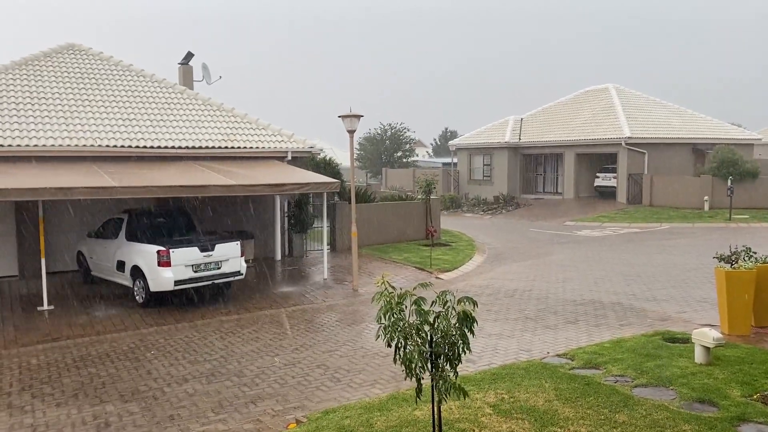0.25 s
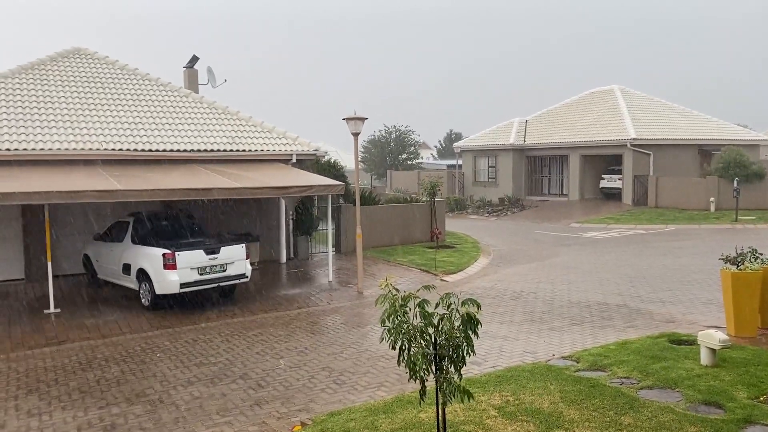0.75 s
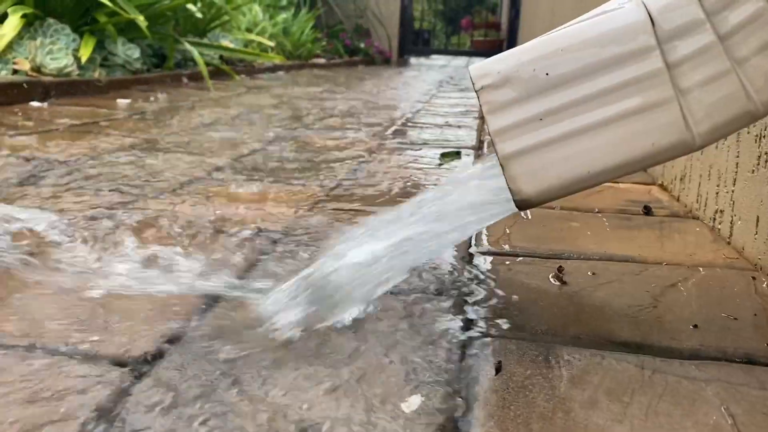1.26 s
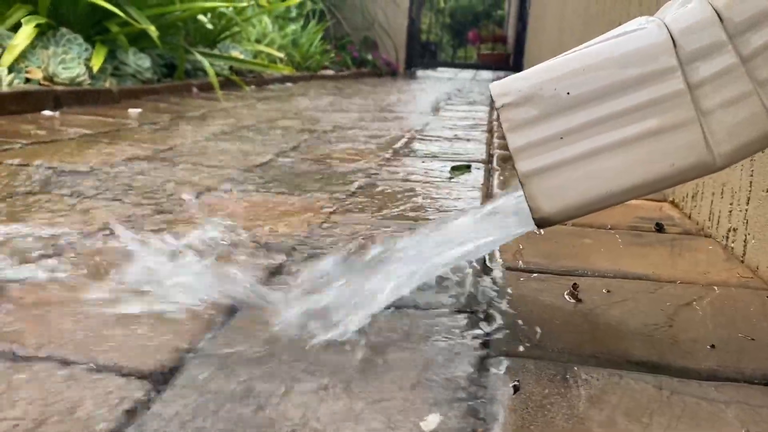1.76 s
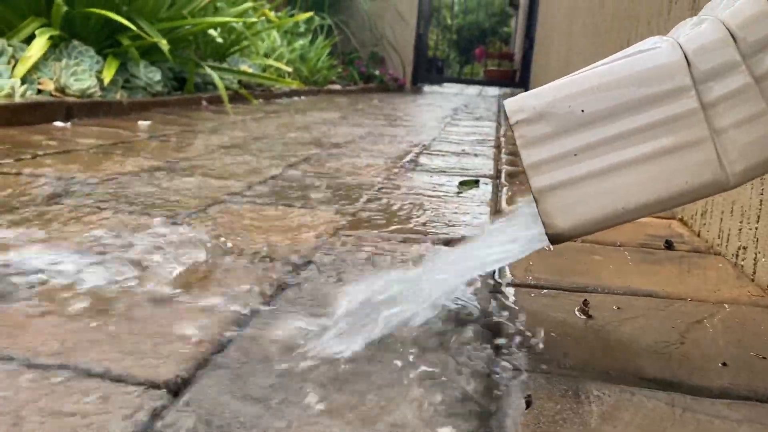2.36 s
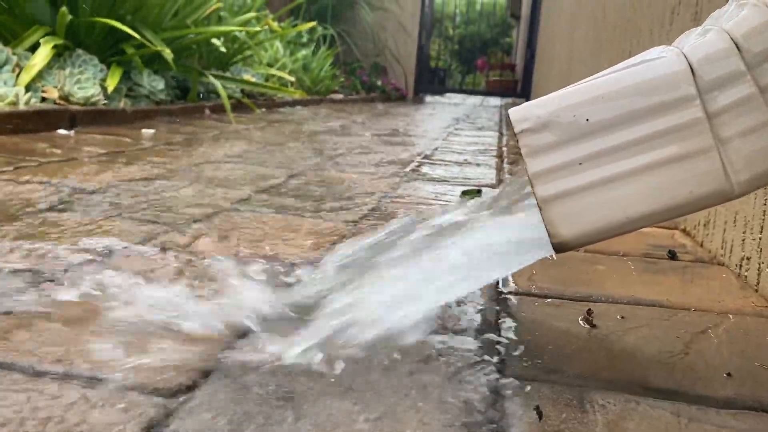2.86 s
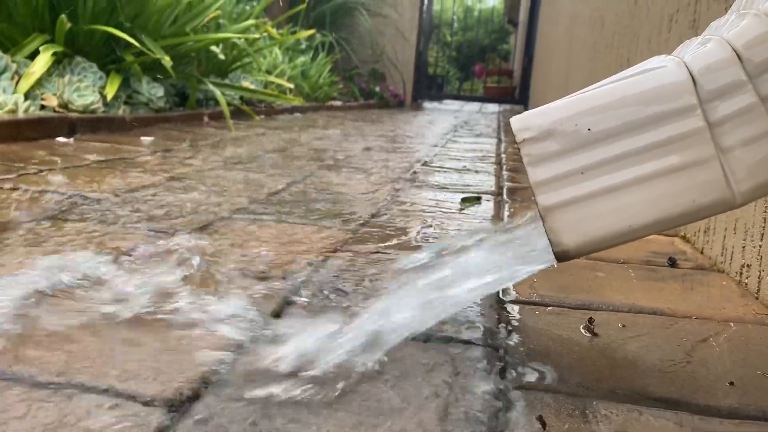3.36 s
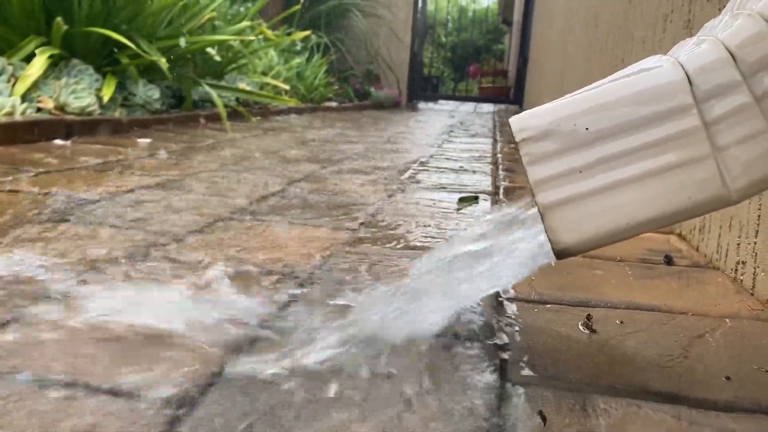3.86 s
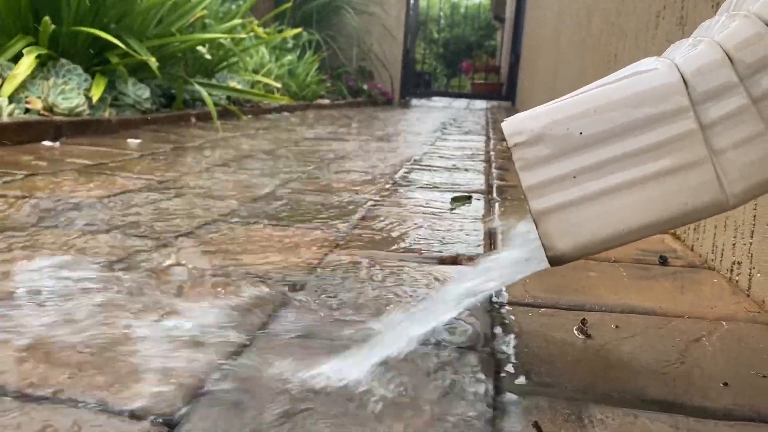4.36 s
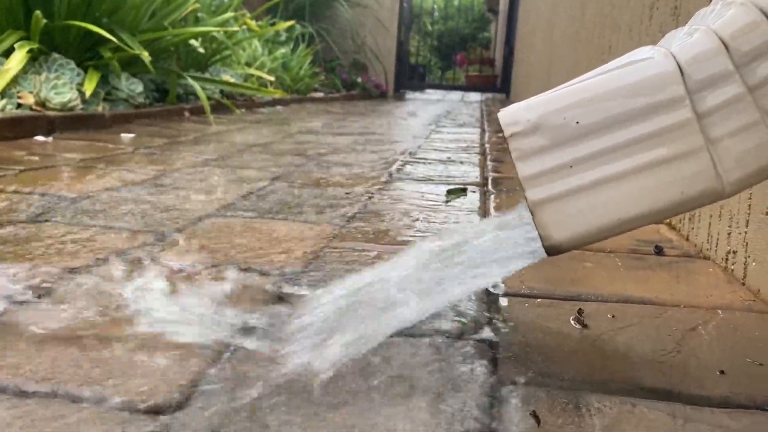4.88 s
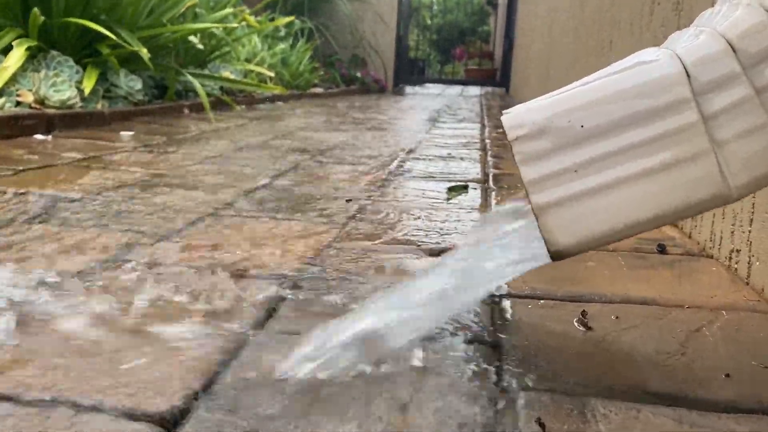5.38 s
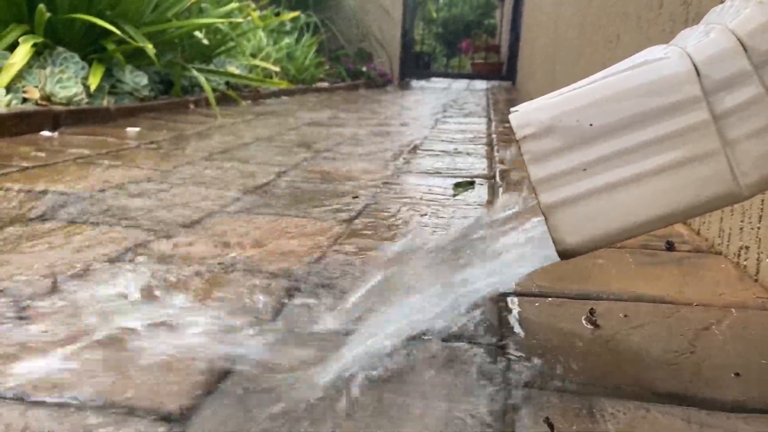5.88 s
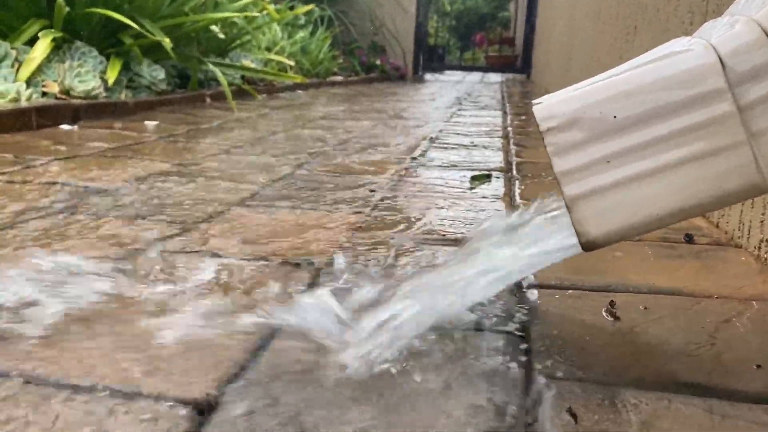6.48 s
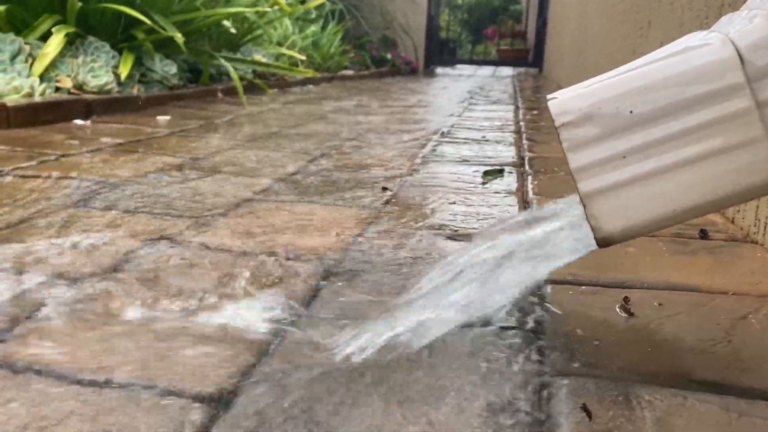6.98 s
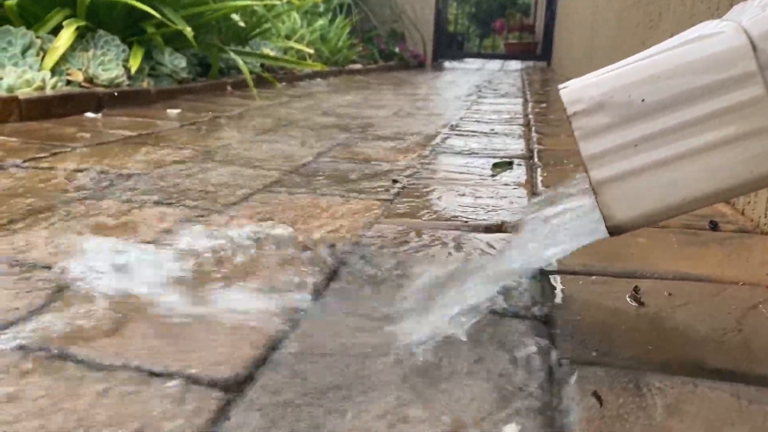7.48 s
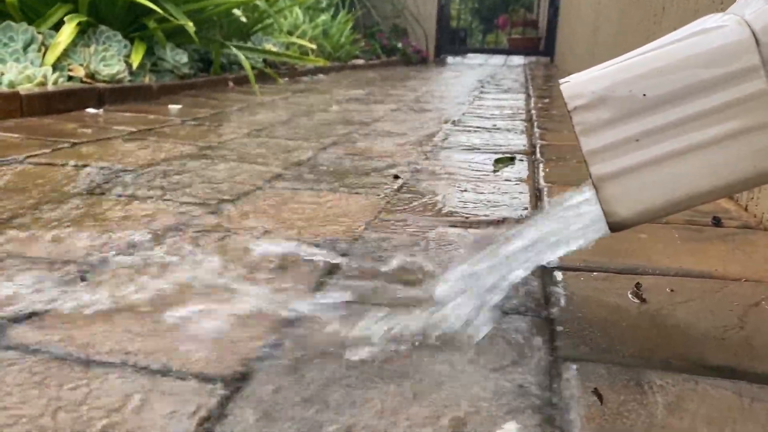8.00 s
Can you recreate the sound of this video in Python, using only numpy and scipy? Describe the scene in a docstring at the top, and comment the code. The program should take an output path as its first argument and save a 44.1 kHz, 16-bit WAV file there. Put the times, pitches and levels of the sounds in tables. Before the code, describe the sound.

Outdoors among houses, heavy rain hisses steadily on paving and patters on a roof for about a second. After a tiny gap of silence, a close downpipe spout bursts in: water slaps wet stone in irregular gushes, with crisp spray, ringing bubbles and hollow gulps from the pipe. Low churning, thuds and soft wind buffets lie beneath, with rain all around. The stereo microphone sits near the spout, and the stream continues to the end.

```python
"""Heavy rain on a paved street with patter on a roof; then, after an instant of silence, the spout of a downpipe.
The stream slaps the wet paving in uneven gushes: noise bursts make the spray, decaying sines the trapped bubbles,
and resonances of the pipe mouth ring along. Gusts on the microphone and water churning in the pipe rumble
underneath as filtered noise, with thumps and thuds. Rain goes on all around as coloured noise with ticking drops."""
import sys
import numpy as np
from scipy import signal
from scipy.fft import rfft, irfft, next_fast_len
from scipy.io import wavfile

SR = 44100
rng = np.random.default_rng(int(sys.argv[2]) if len(sys.argv) > 2 else 0)


def store_pcm(level_fs):
    """Save levels as 16-bit WAV."""
    pcm = np.round(np.clip(level_fs, -1, 1) * 32767).astype(np.int16)
    wavfile.write(sys.argv[1], SR, np.atleast_2d(pcm).T)


N = 363384
TIME = np.arange(N) / SR
PADDED = next_fast_len(N + SR // 2, True)
FREQS = np.maximum(np.arange(PADDED // 2 + 1) * SR / PADDED, 1)
STREET_END_S, SPOUT_START_S = 1.0, 1.048
CUTOFF_HZ = 15850


# Spray thrown off the paving. Each row: frequency in Hz, relative power density in dB.
SPRAY_SPECTRUM = [(150, -16), (400, 3.5), (620, -2), (790, 0), (1130, -3), (1550, -0.5), (2000, -2.5),
                  (2400, -1.5), (3200, -9), (4700, -2.5), (5700, -7.5), (7000, 1), (9000, -8.5),
                  (11000, -2), (13000, -8.5), (16000, -22)]
# Clouds of small bubbles. Each row: centre pitch in Hz, spread in octaves, bubbles per second,
# typical ring in cycles, level in dB relative to the splash.
BUBBLE_CLOUDS = [(1157, 0.17, 45, 21, -18.5), (2105, 0.32, 110, 28, -15), (3663, 0.257, 430, 46, -4.5),
                 (8470, 0.386, 380, 47, -11.5)]
# Air resonances of the pipe mouth. Each row: frequency in Hz, width in Hz, relative level in dB.
MOUTH_MODES = [(907, 45, 5), (1083, 33, 11), (1152, 18, 7), (1250, 32, 0.5), (1987, 140, -13),
               (2930, 180, 4), (3850, 110, -0.5)]
# Water rattling round the pipe mouth. Each row: time in seconds, swell of the ringing in dB (negative dips).
RATTLES = [(1.425, 7), (1.728, 6), (2.61, -2), (3.99, 8.5), (8.135, 9.5)]
# How the spout reaches the two microphones. Each row: frequency in Hz, direct share of power from 0 to 1,
# phase lead of the right one in radians, left minus right level in dB.
SPOUT_PORTS = [(330, .74, .1, -.9), (700, .19, 2.6, .7), (1100, .45, -.4, 3.1), (1450, .25, -.4, 1.2),
               (1950, .35, 1.8, 5.6), (2300, .5, -.9, 3.1), (2750, .6, -1.7, 5.4), (3300, .72, -1, 2.2),
               (3900, .72, 0, .7), (4700, .5, -.4, 6), (5500, .1, -.7, 3.8), (6900, .9, 0, .4),
               (9050, .93, 3.15, 0), (13300, .9, 9.42, 0), (15500, .85, 12.6, 0)]


def stream():
    """The jet breaks into lumps: gushes throw spray, bubbles clump in their own way, the pipe mouth rings along."""
    gush = from_db(1.45 * lumps())
    spatter = rms_one(impacts(3400 * gush, spread_db=3.0, burst_s=0.0011) * gush)
    spray = from_db(-3.5) * colour(spatter, SPRAY_SPECTRUM)
    spray = spray + splashlets(gush, spread_db=1.64, burst_s=0.0017)
    fizz = 0
    for hz, octaves, per_s, cycles, level_db in BUBBLE_CLOUDS:
        clumps = gush * from_db(2.2 * lumps())
        fizz = fizz + from_db(level_db) * bubble_cloud(clumps, hz, octaves, per_s, cycles, spread_db=2.5)
    mouth_db = -13.0 + swells(RATTLES, rise_s=0.029, fall_s=0.06)
    mouth = from_db(mouth_db) * resonate(spatter, MOUTH_MODES)
    drops = plops(bubble_db=-1.5, spray_db=-5.0, smack_db=-4.5) + glugs(glug_db=-9.5, slosh_db=-14.5)
    splash = from_db(flow_db()) * (spray + fizz + mouth) + drops
    return microphones(walls(splash, t60=0.12, echo_db=-2.0), SPOUT_PORTS)


# Heavier slugs of water leave the spout. Each row: time in seconds, swell of the splash in dB (negative dips).
SLUGS = [(1.092, 2.5), (1.136, 3), (1.427, 1), (1.549, 2), (1.723, 2.5), (2.205, 4), (2.555, 5),
         (2.621, 3.5), (2.699, 2.3), (2.869, 4.5), (2.959, 4), (3.073, 3.5), (3.327, 2.5), (3.465, 3.8),
         (3.776, 4), (3.905, 3.5), (3.974, 1), (4.142, 3), (4.582, 2.2), (4.806, 1.5), (5.028, 1),
         (5.462, 1.5), (5.602, 3.5), (5.902, -1), (6.153, 0.5), (6.21, 2), (6.638, -1), (6.743, 3.3),
         (6.853, 2.7), (7.027, 2.5), (7.485, 1.5), (7.563, 3), (7.677, 2.7), (7.817, 3), (7.895, 2.1),
         (8.126, 4.6)]
# The jet thins for a moment. Each row: time in seconds, dip of the splash in dB.
LULLS = [(1.511, -1.9), (1.627, -4), (1.918, -3), (2.447, -2.5), (2.591, -4.5), (2.801, -0.5), (3.25, -1.5),
         (3.507, -4), (3.63, -2.5), (3.827, -2), (4.052, -1.5), (4.103, -3), (4.237, -1), (4.363, -3.5),
         (4.42, -2.0), (4.546, -3.5), (4.896, -2.5), (5.099, -2), (5.168, -1), (5.668, -3.4), (6.249, -1.8),
         (6.303, -4.5), (6.904, -1.5), (6.976, -2), (7.243, -2.5), (7.44, -2.1), (7.533, -3), (7.635, -3.5),
         (7.862, -5.5), (7.994, -3)]


def flow_db():
    """Level of the splash: an even stream that wanders, shifted by each slug of water and sinking in each lull."""
    steady = -30 + 0.4 * drift(rate=16)
    return steady + swells(SLUGS, rise_s=0.017, fall_s=0.027) + swells(LULLS, rise_s=0.03, fall_s=0.03)


def lumps(per_s=150, drain_s=0.009):
    """Uneven lumps of water land at random, start suddenly and drain fast, never piling very high; spread 1."""
    landings = (rng.random(N) < per_s / SR) * rng.uniform(.3, 1, N)
    water = signal.lfilter([1], [1, -np.exp(-1 / (drain_s * SR))], landings)
    swing = rms_one(signal.sosfilt(signal.butter(1, 15, "high", fs=SR, output="sos"), water))
    return rms_one(np.tanh(swing / 2))


# Small splats of different sizes. Each row: low edge in Hz, high edge in Hz, average splats per second
# before the gushes crowd or thin them, level in dB relative to the splash.
SPLASHLETS = [(1460, 2300, 52, -16.5), (2470, 3460, 65, -11), (3130, 4470, 90, -10), (4250, 9000, 80, -9.5),
              (9400, 12100, 60, -11.5)]


def splashlets(gush, spread_db, burst_s):
    """Torn-off blobs splat one over another, each in the pitch range set by its size."""
    out = 0
    for low_hz, high_hz, per_s, level_db in SPLASHLETS:
        edges = [low_hz, min(high_hz, CUTOFF_HZ)]
        band = signal.butter(2, edges, "band", fs=SR, output="sos")
        splats = signal.sosfilt(band, impacts(per_s * gush, spread_db, burst_s))
        out = out + from_db(level_db) * rms_one(splats)
    return out


def bubble_cloud(gush, centre_hz, octaves, per_s, cycles, spread_db, count=9000):
    """Air dragged under by the stream: bubbles of all sizes, more of them in a gush; unit power."""
    out = np.zeros((3, N))
    chance, shape = rng.random((count, 5)), rng.standard_normal((count, 2))
    # a gush takes up a larger part of the running sum, so more births fall in it
    births = np.searchsorted(np.cumsum(gush) / np.sum(gush), chance[:int(per_s * N / SR), 0]) / SR
    heights = from_db(-spread_db * np.log(np.maximum(chance[:, 1], .015)))
    pitches = np.minimum(centre_hz * 2 ** (octaves * shape[:, 0]), CUTOFF_HZ)
    rings = cycles * 2 ** (shape[:, 1] / 2)
    for s, height, hz, ring, phases in zip(births, heights, pitches, rings, chance[:, 2:]):
        add(out, s, height * bubble(hz, ring, phases))
    return rms_one(out)


# Big drops that trap a bubble. Each row: start in seconds, bubble level in dB before its trim,
# bubble pitch in Hz, ring in cycles, spray level in dB before its trim.
PLOPS = [(1.0528, -15, 3820, 60, -23), (1.1333, -14, 3460, 30, -20), (1.418, -19, 2880, 30, -19),
         (1.545, -20, 3400, 54, -20), (2.558, -10.5, 3010, 54, -27), (2.614, -11.5, 3830, 42, -21),
         (2.841, -18, 3400, 35, -33), (3.103, -15, 3020, 34, -28), (3.343, -21, 1980, 26, -34),
         (3.383, -16, 3850, 45, -34), (3.772, -11.5, 1800, 30, -24), (3.913, -16, 4000, 35, -29),
         (3.974, -11, 3700, 30, -25), (3.982, -15, 3020, 48, -30), (4.2738, -18, 2550, 75, -28),
         (4.498, -11.5, 3760, 45, -32), (4.571, -18, 3900, 42, -27), (4.591, -13, 3950, 35, -30),
         (5.016, -19, 3550, 55, -25), (5.041, -16, 3850, 42, -26), (5.4564, -10.5, 2280, 19, -18),
         (5.786, -14, 3640, 42, -26), (5.891, -12, 2950, 42, -17), (5.94, -15, 3400, 35, -31),
         (6.1547, -8, 3170, 29, -19), (6.4495, -6, 3200, 38, -25), (6.627, -21, 1950, 18, -18),
         (6.645, -14, 2740, 36, -16), (6.8518, -13, 3070, 60, -28), (6.9307, -17, 3750, 42, -21),
         (7.327, -14, 3570, 42, -26), (7.353, -20, 2010, 40, -28), (7.491, -18, 3050, 42, -19),
         (7.566, -7, 3070, 28, -20), (7.814, -15, 3280, 42, -19), (7.836, -13.5, 4500, 42, -30),
         (7.897, -15, 2770, 30, -16.5), (8.1215, -18, 2700, 30, -17), (8.208, -16, 1870, 22, -22.5),
         (8.2216, -17, 4480, 42, -23)]
# Water that smacks flat on stone. Each row: start in seconds, peak in dB before its trim,
# centre in Hz, width in octaves.
SMACKS = [(1.134, -16, 3400, .9), (1.6501, -15, 10700, .3), (1.724, -9, 8300, 1.2), (1.96, -11, 6400, 0.31),
          (2.0307, -14, 11200, .3), (2.0633, -6, 10500, 0.66), (2.145, -14, 7190, .3),
          (2.338, -10, 10600, .3), (2.667, -6, 8100, 1), (2.694, -12, 4900, .7), (3.031, -13, 10700, .3),
          (3.773, -16, 2600, 0.89), (3.898, -8, 7250, 0.71), (3.9828, -8, 5000, 3.1),
          (4.273, -23, 2880, .7), (4.824, -3.5, 6860, 0.34), (4.953, -12, 7150, 0.44),
          (5.042, -14, 3900, 0.8), (5.3342, -7.5, 11000, 0.54), (5.787, -16, 3700, .7),
          (5.9402, -11, 4500, 0.36), (6.224, -6.5, 8450, .8), (6.4494, -10, 3300, 0.52),
          (6.5125, -18, 3900, 0.53), (6.553, -10, 10900, .3), (6.5642, -16, 4000, 1.3),
          (6.645, -17, 3300, 0.46), (6.931, -15, 3800, .8), (7.4715, -9, 4400, 1.4),
          (7.5664, -7, 4100, 0.8)]


def plops(bubble_db, spray_db, smack_db):
    """A big drop slaps the puddle and rings one bubble; water landing flat on stone gives one sharp smack."""
    out = np.zeros((3, N))
    for s, peak_db, hz, cycles, splash_db in PLOPS:
        add(out, s, from_db(peak_db + bubble_db) * bubble(hz, cycles, rng.random(3)))
        add(out, s, from_db(splash_db + spray_db) * slap(hz, octaves=2.1, decay_s=0.0088))
    for s, peak_db, hz, octaves in SMACKS:
        crack = slap(hz, octaves, decay_s=0.0018)
        crack = crack / np.abs(crack).max(axis=1, keepdims=True)
        add(out, s, from_db(peak_db + smack_db) * crack)
    return out


# Air pockets that gulp in the pipe mouth. Each row: start in seconds, level in dB before the trims,
# pitch in Hz, ring in cycles.
GLUGS = [(1.579, -13, 1020, 12), (1.81, -9, 1190, 7.8), (2.561, -11.5, 1240, 30), (2.614, -10.5, 1020, 20),
         (3.104, -18, 1310, 28), (3.949, -17, 1800, 20), (3.962, -16, 1250, 17), (4.061, -16, 1050, 12),
         (4.161, -13, 1310, 14), (4.451, -15, 1420, 22), (4.465, -17, 1200, 11), (4.703, -16, 1246, 200),
         (4.777, -6.5, 1140, 10), (5.626, -9, 1260, 27), (6.453, -15, 1200, 30), (6.794, -10.5, 1240, 18),
         (7.607, -13, 1140, 10)]


def glugs(glug_db, slosh_db):
    """Large air pockets break with a slosh; each rings and rises only a little in pitch."""
    out = np.zeros((3, N))
    for s, peak_db, hz, cycles in GLUGS:
        add(out, s, from_db(peak_db + glug_db) * bubble(hz, cycles, rng.random(3), rise=0.1))
        add(out, s, from_db(peak_db + slosh_db) * slap(hz, octaves=0.67, decay_s=0.0031))
    return out


def bubble(hz, cycles, phases, rise=0.12):
    """A bubble dies by 60 dB within its cycles and rises in pitch near the surface; each path has its phase."""
    age = np.arange(max(int(cycles / hz * SR), 2)) * hz / (cycles * SR)  # 0 at birth, 1 at the end
    swell = 1 - np.exp(-2 * np.pi * cycles * age)
    turns = cycles * age * (1 + rise * age / 2) + phases[:, None]
    return np.sin(2 * np.pi * turns) * swell * np.exp(-np.log(1000) * age)


def slap(hz, octaves, decay_s):
    """A burst of noise around a pitch that dies away; unit power before its decay."""
    t = TIME[:SR // 20]
    edges = np.minimum(hz * 2 ** (octaves * np.array([-.5, .5])), .45 * SR)
    band = signal.sosfilt(signal.butter(2, edges, "band", fs=SR, output="sos"), noise(len(t)))
    return rms_one(band) * np.exp(-t / decay_s)


def impacts(per_s, spread_db, burst_s):
    """Drops of uneven size land at random, each a tiny burst of noise that dies at once; unit power."""
    sizes = from_db(spread_db * np.minimum(rng.exponential(1, N), 5.5))
    energy = (rng.random(N) < per_s / SR) * sizes ** 2
    dying = signal.lfilter([1], [1, -np.exp(-2 / (burst_s * SR))], energy + 1e-18)
    return rms_one(np.sqrt(dying) * noise())


def walls(x, t60, echo_db):
    """The passage between the houses adds a short tail to the scattered paths."""
    t = TIME[:SR // 3]
    tail = noise(len(t)) * np.exp(-np.log(1000) * t / t60)
    tail /= np.sqrt(np.sum(tail[0] ** 2))
    echo = signal.fftconvolve(x, tail * [[0], [1], [1]], axes=1)[:, :N]
    return x + from_db(echo_db) * echo


# Deep drone. Each row: time in seconds, level in dB.
DRONE_LEVEL = [(1.06, -48), (5.9, -50), (6.7, -40), (7.7, -39), (8.24, -45)]
# Water churning inside the pipe. Each row: frequency in Hz, relative power density in dB.
GURGLE_SPECTRUM = [(60, -21), (160, -1), (250, -3), (330, -4), (430, -10), (600, -19), (2000, -65)]
# Low resonances of the air in the pipe. Each row: frequency in Hz, width in Hz, relative level in dB.
PIPE_HUM_MODES = [(157, 66, 2.5), (214, 36, -6), (272.2, 9.1, 4.5), (314.2, 28, 3.5)]
# Churning in the pipe. Each row: time in seconds, level in dB before its mix trims and tumbling.
CHURN_LEVEL = [(1.06, -36), (1.6, -38), (1.75, -30.5), (2.04, -28), (2.16, -32.5), (2.33, -28),
               (2.46, -36.5), (3.0, -35.5), (4.0, -38), (5.2, -39), (6.0, -38), (6.9, -35.5), (7.35, -40),
               (8.24, -39)]
# Wind on the microphone. Each row: frequency in Hz, relative power density in dB.
GUST_SPECTRUM = [(15, -21), (38, -16), (60, 0.5), (85, -1.5), (108, -0.5), (140, -6), (200, -11.5),
                 (400, -28), (2000, -64)]
# How the rumble reaches the two microphones. Each row: frequency in Hz, direct share of power from 0 to 1,
# phase lead of the right one in radians, left minus right level in dB.
RUMBLE_PORTS = [(20, .7, 0, 0), (60, .88, 0, .4), (200, .93, 0, 0), (350, .8, 0, -.7), (600, .4, 0, 1)]


def rumble():
    """Gusts press on the microphone over a deep drone; water tumbling down the pipe sounds its air column."""
    gust = from_db(wind_db()) * colour(noise(), GUST_SPECTRUM) + buffets(buffet_db=-2.0, cycles=4.9)
    drone = from_db(in_time(DRONE_LEVEL)[0]) * resonate(noise(), [(54.3, 13, 0)])
    water = from_db(-5.5) * colour(noise(), GURGLE_SPECTRUM)
    hum = from_db(-4.5) * resonate(colour(noise(), GURGLE_SPECTRUM), PIPE_HUM_MODES)
    tumbling_db = 1.54 * drift(rate=15)
    churn = from_db(in_time(CHURN_LEVEL)[0] + tumbling_db) * (water + hum)
    muffle = signal.butter(2, 340, fs=SR, output="sos")
    knocks = signal.sosfilt(muffle, thuds(thud_db=-6.0, cycles=12.5, slosh_db=-13.0))
    return microphones(gust + drone + churn + knocks, RUMBLE_PORTS)


# Plugs of water thud into the bend of the pipe. Each row: start in seconds,
# level in dB before the trims and muffling, pitch in Hz.
THUDS = [(1.754, -15, 198), (1.836, -30, 257), (1.885, -18, 222), (1.935, -16.5, 300), (1.964, -11, 273),
         (2.021, -16, 222), (2.049, -10, 277), (2.157, -23, 200), (2.221, -18, 300), (2.286, -22, 234),
         (2.348, -16, 305), (2.382, -22, 256), (2.871, -17, 227), (3.01, -16, 307), (4.24, -10, 264),
         (4.785, -17.5, 237), (5.495, -12.5, 240), (6.026, -18, 216)]


def thuds(thud_db, cycles, slosh_db):
    """Each plug of water knocks the air in the pipe for a few cycles and sloshes on."""
    out = np.zeros((3, N))
    for s, peak_db, hz in THUDS:
        add(out, s, from_db(peak_db + thud_db) * bubble(hz, cycles, rng.random(3)))
        add(out, s, from_db(peak_db + slosh_db) * slap(hz, octaves=1.0, decay_s=0.013))
    return out


# The breeze on the microphone. Each row: time in seconds, level in dB before its flutter.
BREEZE_LEVEL = [(1.06, -39), (1.45, -34.5), (1.65, -36.5), (1.92, -32), (2.35, -28.5), (2.7, -41.5),
                (3.8, -35.5), (4.4, -43), (5.7, -38.5), (7.0, -36.5), (7.7, -44), (8.24, -39)]


def wind_db():
    """Level of the wind: a fluttering breeze."""
    return in_time(BREEZE_LEVEL)[0] + 1.5 * drift(rate=13)


# Eddies that thump the microphone. Each row: centre in seconds, peak in dB before its trim, pitch in Hz.
BUFFETS = [(1.472, -22, 99), (1.908, -21, 105), (1.937, -22, 106), (2.0, -22, 127), (2.034, -25, 131),
           (2.176, -18.5, 133), (2.238, -21, 110), (2.269, -17, 110), (2.289, -12, 104), (2.34, -23, 106),
           (2.387, -24, 122), (2.517, -21.5, 101), (3.366, -19, 103), (4.65, -26, 103), (6.03, -25, 98),
           (6.677, -32, 103), (6.723, -25, 95), (7.05, -23, 105), (7.639, -23, 87)]


def buffets(buffet_db, cycles):
    """Each eddy shoves the microphone to and fro a few times: a soft thump on the direct path alone."""
    out = np.zeros((3, N))
    for s, peak_db, hz in BUFFETS:
        t = TIME[:int(cycles / hz * SR)]
        thump = np.hanning(len(t)) * np.sin(2 * np.pi * (hz * t + rng.random()))
        add(out, s - t[-1] / 2, from_db(peak_db + buffet_db) * thump * [[1], [0], [0]])
    return out


def rain(spectrum, per_s, drops_db):
    """Countless far drops merge into a wash; nearer ones tick on the paving; unit power."""
    brighten = signal.butter(1, 1500, "high", fs=SR, output="sos")
    ticks = signal.sosfilt(brighten, impacts(per_s, spread_db=2.1, burst_s=0.0005))
    return colour(noise() + from_db(drops_db) * ticks, spectrum)


# Resonances of a roof under the rain. Each row: frequency in Hz, width in Hz, relative level in dB.
ROOF_MODES = [(715, 75, -2), (840, 60, -12), (1510, 90, -9), (2150, 160, -7.5)]


def roof_patter(per_s):
    """Raindrops drum evenly on a roof and sound its short resonances; unit power."""
    return resonate(impacts(per_s, spread_db=0.9, burst_s=0.00046), ROOF_MODES)


def noise(count=N):
    """White noise on three paths: direct to both microphones, scattered to the left, scattered to the right."""
    return rng.standard_normal((3, count))


def from_db(db):
    """Decibels to gain."""
    return 10 ** (np.asarray(db) / 20)


def rms_one(x):
    """Scale to unit power."""
    return x / np.sqrt(np.mean(x ** 2) + 1e-20)


def in_time(rows):
    """Each column of a curve at every sample."""
    s, *columns = np.transpose(rows)
    return np.array([np.interp(TIME, s, c) for c in columns])


def swells(rows, rise_s, fall_s):
    """Level in dB of brief swells that share one rounded rise and fall."""
    total_db = 0
    for s, height_db in rows:
        side_s = np.where(TIME < s, rise_s, fall_s)
        total_db = total_db + height_db * np.exp(-((TIME - s) / side_s) ** 2)
    return total_db


def drift(rate):
    """Smooth chance with spread 1 that changes about rate times a second."""
    # twice-smoothed noise at a twentieth of the sample rate; its start is dropped to let it settle
    r = np.exp(-40 * np.pi * rate / SR)
    slow = signal.lfilter([1], [1, -2 * r, r * r], rng.standard_normal(N // 20 + 2002))[2000:]
    return np.interp(np.arange(N) / 20, np.arange(len(slow)), rms_one(slow))


def colour(x, spectrum):
    """Give a white sound a spectrum, drawn over log frequency; unit power."""
    hz, level_db = np.transpose(spectrum)
    gain = from_db(np.interp(np.log(FREQS), np.log(hz), level_db))
    return rms_one(irfft(rfft(x, PADDED) * gain, PADDED)[:, :N])


def resonate(x, modes):
    """Parallel two-pole resonances; unit power."""
    out = 0
    for hz, width, level_db in modes:
        r = np.exp(-np.pi * width / SR)
        poles = [1, -2 * r * np.cos(2 * np.pi * hz / SR), r * r]
        out = out + from_db(level_db) * (1 - r * r) * signal.lfilter([1, 0, -1], poles, x)
    return rms_one(out)


def add(out, s, sound):
    """Mix a sound in at a time."""
    part = out[:, max(int(s * SR), 0):][:, :sound.shape[1]]
    part += sound[:, :part.shape[1]]


def microphones(x, ports):
    """The direct path reaches both microphones out of step; the scattered paths are separate for each."""
    hz, *columns = np.transpose(ports)
    share, phase, balance_db = [np.interp(FREQS, hz, c) for c in columns]
    share, paths = np.clip(share, 0, 1), rfft(x, PADDED)
    direct = np.sqrt(share) * np.exp(.5j * phase * [[-1], [1]]) * paths[0]
    scattered = np.sqrt(1 - share) * paths[1:]
    balance = from_db(balance_db / 2 * [[1], [-1]])
    return irfft((direct + scattered) * balance, PADDED)[:, :N]


# Rain on the open street. Each row: frequency in Hz, relative power density in dB.
STREET_RAIN = [(20, -8), (60, 0.5), (170, 1.5), (330, -2.5), (560, -2), (740, 1), (1000, 0.5), (1600, -3.5),
               (2300, -8), (3200, -9.5), (6000, -11), (10500, -13.5), (13000, -17), (16000, -26)]
# Rain around the spout. Each row: frequency in Hz, relative power density in dB.
YARD_RAIN = [(100, 3), (500, 3.5), (1000, 2.5), (3000, 4), (8000, 1.5), (16000, -3)]
# How the rain reaches the two microphones in both places. Each row: frequency in Hz, direct share of power
# from 0 to 1, phase lead of the right one in radians, left minus right level in dB.
RAIN_PORTS = [(60, 0.97, -0.13, 0.2), (300, 0.78, -0.28, -0.0), (700, 0.38, -0.96, 1.9),
              (1100, 0.28, -1.91, 1.9), (2300, 0.34, -0.19, -0.6), (3200, 0.29, -1.26, 2.6),
              (4400, 0.51, -0.24, 1.7), (5600, 0.06, -0.17, 1.0), (6900, 0.73, -0.06, 0.1),
              (9050, 0.99, 3.15, 0.0), (13300, 1.0, 9.42, -0.0), (15500, 0.9, 12.6, 0)]


def scene():
    """First the open street, then an instant of silence, then the spout with rain around it."""
    on_street, at_spout = TIME < STREET_END_S, TIME >= SPOUT_START_S
    street = from_db(-29.5) * rain(STREET_RAIN, per_s=910, drops_db=-5.0)
    street = street + from_db(-39.0) * roof_patter(per_s=300)
    yard = from_db(-33.5) * rain(YARD_RAIN, per_s=710, drops_db=-10.5)
    downpour = microphones(np.where(on_street, street, yard), RAIN_PORTS)
    return downpour * (on_street | at_spout) + (stream() + rumble()) * at_spout


def record(dry):
    """The top is cut steeply."""
    return signal.sosfilt(signal.ellip(12, .1, 90, CUTOFF_HZ, fs=SR, output="sos"), dry)


dry = scene()
out = record(dry)
store_pcm(out)
```